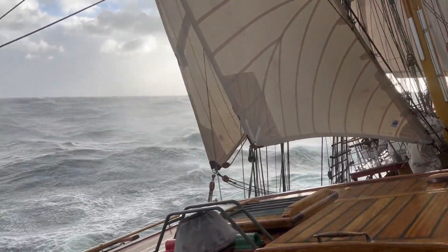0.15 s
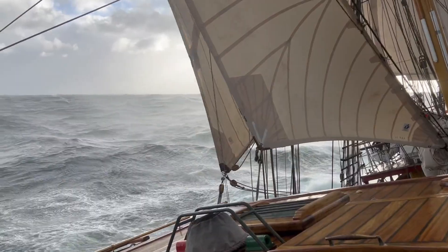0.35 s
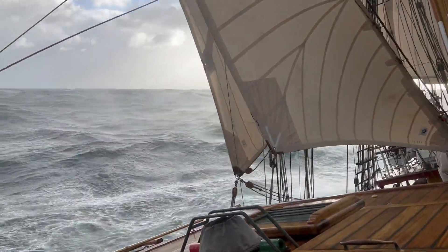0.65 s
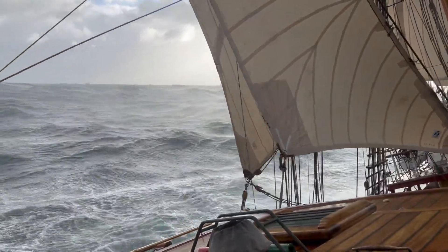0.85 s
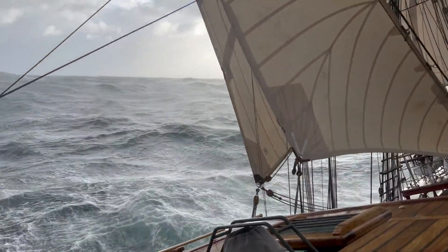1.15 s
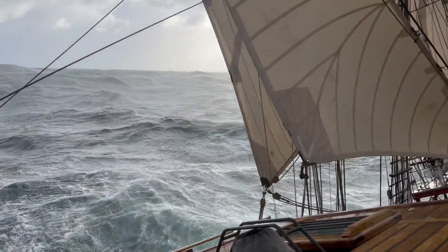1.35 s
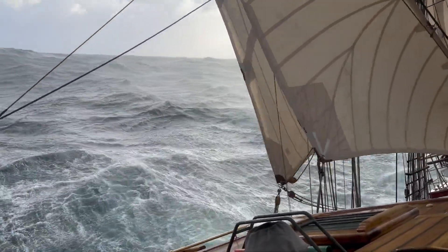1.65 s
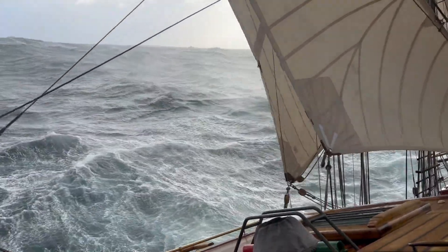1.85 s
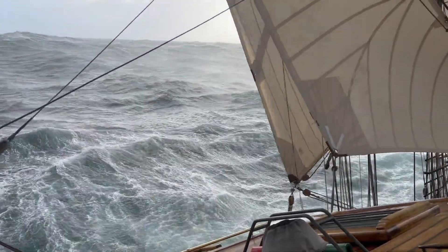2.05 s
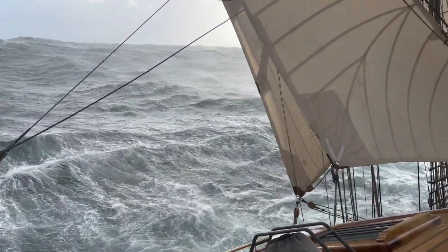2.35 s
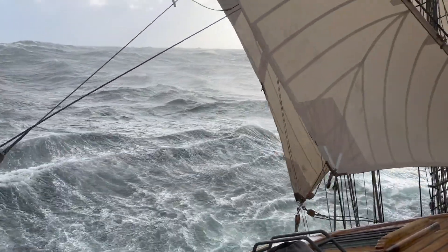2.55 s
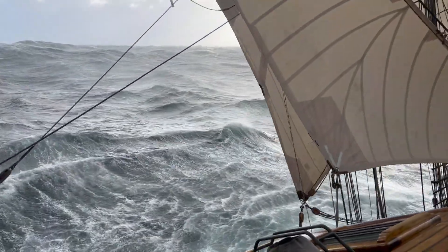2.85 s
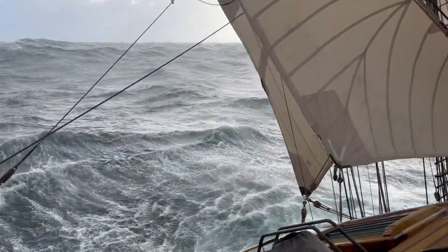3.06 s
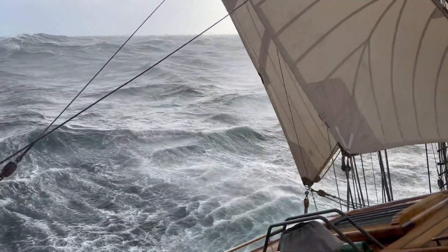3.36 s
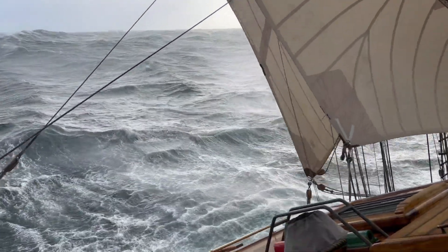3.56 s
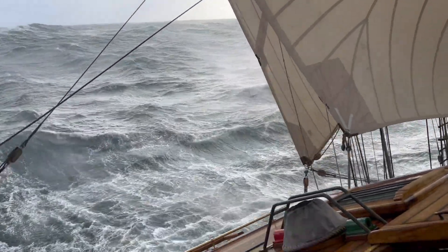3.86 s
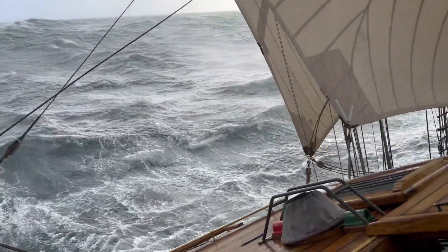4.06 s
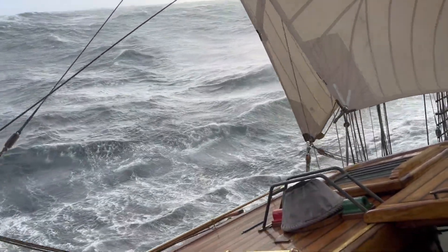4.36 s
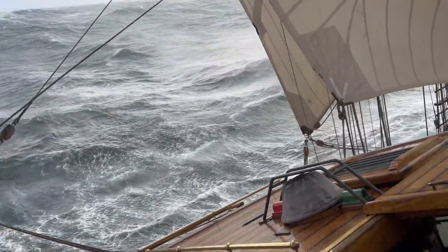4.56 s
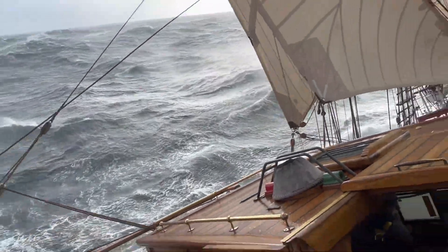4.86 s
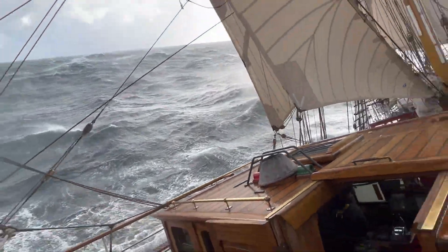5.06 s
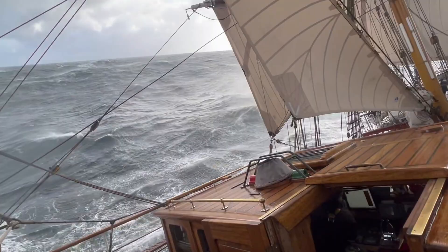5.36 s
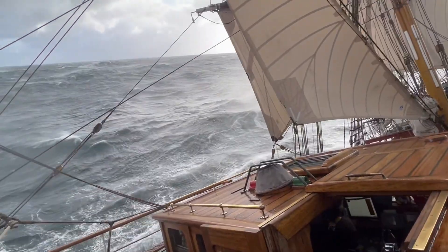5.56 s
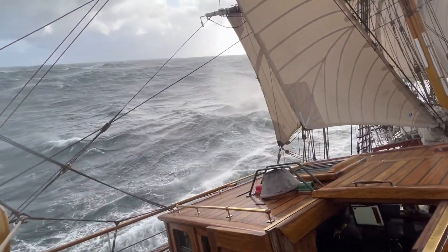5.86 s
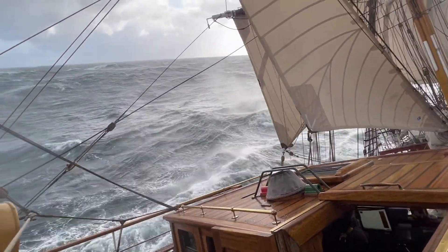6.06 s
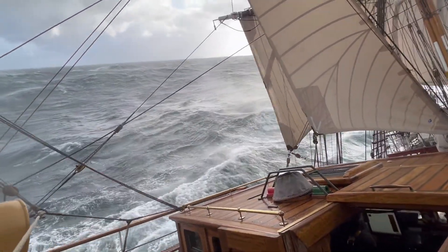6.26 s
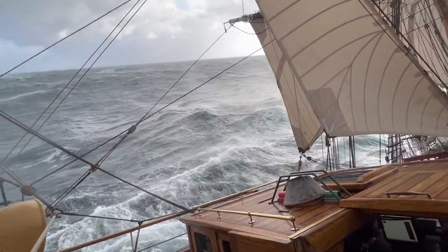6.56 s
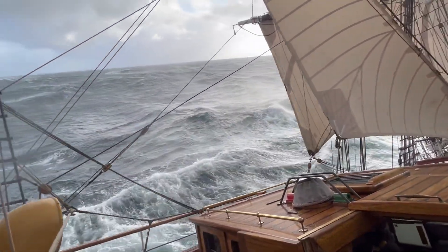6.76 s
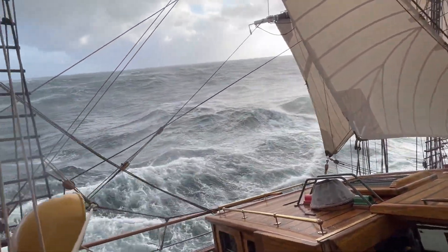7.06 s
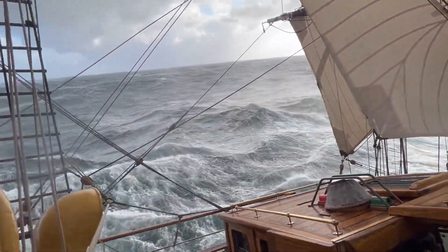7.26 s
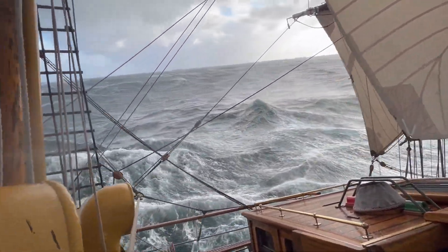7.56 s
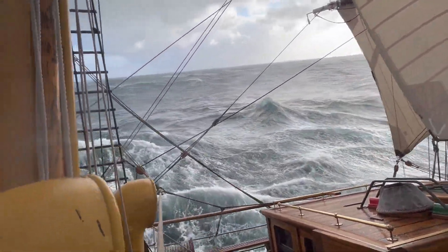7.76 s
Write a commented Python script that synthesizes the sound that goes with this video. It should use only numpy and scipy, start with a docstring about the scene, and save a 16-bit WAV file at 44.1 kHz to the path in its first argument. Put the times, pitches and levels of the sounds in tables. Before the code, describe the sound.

Gale wind buffets the microphone in rapid, uneven gusts, with a low rumble and faint waves behind.

```python
"""A gale buffets the ports of a phone on an open deck at sea. Eddies tear past as short bursts of
pressure jerks over a restless rumble; they snap, spit in the port's cavity and, at their hardest, thump
the phone's body. The bass stays in the middle and the treble spreads wide. Distant waves roar behind.
Late on, blown spray fades in and a thin top band opens, full of hiss and fine ticks."""
import sys
import numpy as np
from scipy import signal
from scipy.fft import rfft, irfft, next_fast_len
from scipy.io import wavfile
from scipy.ndimage import uniform_filter1d, minimum_filter1d

SR = 44100
rng = np.random.default_rng(int(sys.argv[2]) if len(sys.argv) > 2 else 0)


def log_audio(samples):
    """Write samples as a 16-bit WAV file to the path given in sys.argv[1]."""
    # one column per channel
    frames = np.atleast_2d(samples).T
    # limit to full scale, then quantise
    limited = np.clip(frames, -1, 1)
    pcm = np.round(limited * 32767).astype(np.int16)
    wavfile.write(sys.argv[1], SR, pcm)


N = 349095
FFT_SIZE = next_fast_len(N + SR // 2)
BIN_HZ = np.fft.rfftfreq(FFT_SIZE, 1 / SR) + 1  # 1 Hz up, to keep logarithms finite
SPREAD = np.array([[1], [-1]])  # opposite polarity in the two ears
THUD_HZ, SCRATCH_HZ, RASP_HZ = 212, 1265, 2980  # crossovers: thud | tear | scratch | rasp
HISS_DB = -17.5  # the stream's scratch relative to its rush

# passing eddies: crest t/s, tear level/dB, scratch over tear/dB, far port over scratch/dB, length/ms
EDDIES = [(0.058, -27, -24, 9, 16), (0.106, -16.5, -7, 3.5, 19), (0.134, -24.5, -3.5, 1, 24),
          (0.169, -8, -13.5, 1, 7.4), (0.225, -25, -21, 16, 18), (0.264, -32, -11.5, 11.5, 22),
          (0.303, -31.5, -20, 12.5, 19), (0.374, -21, -16, 6.5, 29), (0.451, -25.5, -14.5, 10.5, 15),
          (0.474, -16, -11, -6.5, 19), (0.512, -20.5, -25.5, 16.5, 4.8), (0.552, -23.5, -22, 18.5, 11),
          (0.584, -20.5, -12.5, 2.5, 11), (0.616, -14, -19.5, 11, 5.8), (0.666, -15, -10.5, -1, 19.4),
          (0.724, -17.5, -9.5, 3, 18), (0.746, -21, -8, 9, 5.5), (0.777, -26, -26, 9, 4.2),
          (0.86, -18.5, -10, 4, 18.5), (0.901, -23, -26, 14.5, 57), (0.981, -23.5, -25, 12.5, 6.4),
          (0.995, -15.5, -26, 9.5, 11), (1.042, -28, -10.5, 5, 14), (1.066, -17, -14.5, 7, 21.4),
          (1.116, -19, -12.5, 4.5, 21), (1.208, -21.5, -18.5, 11.5, 9), (1.244, -12, -12.5, 5, 15.8),
          (1.265, -26, -2, -2, 4.5), (1.319, -30, -12.5, 7, 9.7), (1.382, -23, -17, 8, 22),
          (1.452, -32.5, -33.5, 21, 18), (1.495, -35.5, -30, 17, 14), (1.55, -32, -30.5, 12, 12),
          (1.635, -26, -32.5, 16, 13), (1.747, -21, -15, -14.5, 26), (1.851, -21.5, -12.5, -11.5, 13),
          (1.874, -22.5, -12, 0, 6.1), (1.889, -16.5, -24, -1, 2.2), (1.921, -18.5, -12.5, -13.5, 13),
          (2.121, -28, -14, -6, 14), (2.295, -16.5, -5.5, -10, 12.8), (2.33, -34, -15, 8.5, 50),
          (2.358, -27, -6.5, 4, 4), (2.387, -22, -16, 2, 22.5), (2.439, -21, -18, -8, 17),
          (2.472, -30, -8, -5, 18), (2.632, -30, -13, -8, 12), (2.683, -27.5, -13, -4, 8.1),
          (2.708, -21, -16.5, -5, 6.4), (2.735, -24.5, -24, 12, 26), (2.774, -20, -5, -3, 16.3),
          (2.799, -18.5, -18, 8, 8), (2.855, -31, -16.5, 10, 19), (2.953, -26.5, -16, -7, 5.9),
          (3.09, -33.5, -27, 15, 26), (3.289, -15, -36, 9, 2.1), (3.312, -19.5, -19, -0.5, 15.6),
          (3.332, -26, -19, 6, 7.9), (3.368, -37, -24, 14, 12), (3.404, -26, -12.5, -1, 12),
          (3.436, -29.5, -26, 25.5, 4.3), (3.458, -39, -18, 14, 3), (3.506, -17.5, -16.5, 5, 15.4),
          (3.564, -29.5, -7.5, 4.5, 35), (3.6, -23.5, -34, 18, 29), (3.656, -30, -24, 21, 7.1),
          (3.742, -49, -9, 13, 39), (3.882, -30, -12.5, -9.5, 7.7), (3.916, -31.5, -17.5, 11.5, 11),
          (3.956, -18.5, -12, 0.5, 18.5), (3.984, -27.5, -9.5, 1.5, 17), (4.092, -27.5, -17, 6, 35),
          (4.127, -18.5, -6, -13, 16), (4.163, -18.5, -10, -18, 12.5), (4.208, -26.5, -20, 8.5, 28),
          (4.33, -15.5, -17.5, 1, 16), (4.401, -20, -22, -1, 6.9), (4.437, -21, -19, -3, 15),
          (4.459, -25, 2, 1, 6.5), (4.527, -28, -13, -11, 18), (4.573, -21.5, -10.5, 0, 8.8),
          (4.598, -19.5, -6.5, -11, 19), (4.635, -16, -21.5, -3, 1.5), (4.699, -27.5, -2.5, -27, 3.1),
          (4.822, -14, -4.5, 0.5, 9.5), (4.845, -15, -10, -10.5, 20), (4.87, -13.5, 4.5, -15, 2.9),
          (4.917, -27.5, -8, 4, 73), (4.952, -24.5, -9, 5.5, 18), (4.979, -17.5, -8.5, -4.5, 13.5),
          (5.041, -30.5, -3, 1.5, 17), (5.123, -22, -9, -7, 12.4), (5.161, -26, -6, 7, 22),
          (5.205, -21.5, -10.5, -0.5, 30), (5.272, -18.5, -6, -4, 24.7), (5.316, -30, -24, 15.5, 19),
          (5.352, -20, -12.5, 1, 6.8), (5.417, -22, -9.5, 8.5, 35), (5.493, -9.5, -3, -7, 12.5),
          (5.528, -31, -32, 20, 7.1), (5.561, -31, -23, 20, 8.7), (5.616, -25, -10, 2.5, 20),
          (5.665, -27, -13, 7.5, 24), (5.716, -20.5, -6, 6, 12), (5.755, -29, -8, 5, 10),
          (5.795, -26, -29, 19, 21), (5.935, -19.5, -8, 4.5, 25.3), (5.979, -32.5, -14, 7.5, 27),
          (6.141, -27, -5.5, 5, 2), (6.168, -27.5, -13, 6.5, 10), (6.267, -15.5, -6, -4.5, 15),
          (6.293, -13.5, -12.5, -7.5, 17.4), (6.378, -23, -15.5, 9, 7.4), (6.4, -24.5, -11.5, 5, 32),
          (6.434, -22.5, -6.5, 4.5, 17), (6.509, -15.5, -9.5, -5.5, 23), (6.57, -25.5, -18, 3, 16),
          (6.598, -19, -12.5, 6, 27), (6.651, -20, -13, -7, 2.7), (6.718, -20.5, -9.5, 5, 14.2),
          (6.856, -45, -6, 9, 3.6), (6.936, -38.5, -13, -8, 27), (7.008, -31.5, -26, 18, 15),
          (7.07, -35, -21, 15, 6.4), (7.131, -33, -15, -14, 29), (7.323, -33.5, -29, -5, 22),
          (7.361, -29, -26, 7, 32), (7.425, -31, -21, 0, 7.8), (7.496, -34, -13, 13, 5.8),
          (7.588, -18.5, -10, 2, 16.4), (7.622, -24.5, -16.5, -6, 19), (7.688, -18.5, -13.5, -9, 16),
          (7.72, -26.5, -27.5, 14, 7.2), (7.761, -41, -15, 13.5, 7.2), (7.85, -16, -16, -18, 25.6),
          (7.901, -21, -8, -10, 5)]
# the stream of air between eddies: t/s, rush level/dB, rasp level/dB
STREAM = [(0.0, -22.5, -52.5), (0.33, -26.5, -60), (0.42, -38, -67), (0.5, -33.5, -69.5),
          (0.6, -23.5, -59.5), (0.81, -34, -61), (1.36, -36, -71.5), (1.74, -37, -72), (2.05, -37, -65.5),
          (2.4, -38, -68), (2.56, -38.5, -69), (2.8, -31.5, -67), (3.15, -37.5, -68), (3.28, -29.5, -72),
          (3.46, -32.5, -67.5), (3.86, -36.5, -65.5), (4.1, -35, -67), (4.27, -32.5, -63), (4.4, -36, -72),
          (4.7, -39, -68.5), (5.22, -34.5, -60), (5.34, -29.5, -55), (5.49, -33, -56.5), (6.02, -40.5, -85),
          (6.26, -35, -64), (6.48, -37.5, -65), (6.74, -44.5, -73), (7.08, -41.5, -68.5),
          (7.58, -37.5, -69.5), (7.83, -36, -62), (7.92, -24.5, -70)]
# tone of the wind at the near port: f/Hz, relative level/dB
WIND_TONE = [(12, -42.5), (20, -22), (49, -3), (69, 1.5), (124, -1), (239, -6.5), (355, -9), (944, -14.5),
             (1480, -25.5), (2940, -29), (5250, -53.5), (5990, -57), (8670, -83.5), (9640, -73.5),
             (11000, -103), (14300, -133), (22000, -120)]


def undb(db):
    """Decibels to amplitude."""
    return 10 ** (np.asarray(db) / 20)


def along(table):
    """Envelopes from rows of (t/s, values...), one value a sample."""
    times, *columns = np.transpose(table)
    return [np.interp(np.arange(N) / SR, times, column) for column in columns]


def on_bins(points):
    """A curve through (f/Hz, value) points, one value a frequency bin."""
    hz, value = np.transpose(points)
    return np.interp(np.log(BIN_HZ), np.log(hz), value)


def slope(hz, order):
    """Gain in dB of a high-pass (order above 0) or low-pass (below 0) skirt."""
    return -10 * np.log10(1 + (hz / BIN_HZ) ** (2. * order))


def colour(x, db, phase=None):
    """EQ that keeps the power of white noise; minimum phase unless a phase in radians is given."""
    if phase is None:
        cepstrum = irfft(db * np.log(10) / 20, FFT_SIZE)
        cepstrum[1:FFT_SIZE // 2] *= 2
        cepstrum[FFT_SIZE // 2 + 1:] = 0
        phase = rfft(cepstrum).imag
    gain = undb(db)
    response = np.exp(1j * phase) * gain / np.sqrt(np.mean(gain ** 2))
    return irfft(rfft(x, FFT_SIZE) * response, FFT_SIZE)[:N]


def flicker(rate, depth_db):
    """Gain that wanders at random about rate times a second; mean power 1."""
    hold = max(int(SR / rate), 1)
    walk = uniform_filter1d(np.repeat(rng.standard_normal(N // hold + 1), hold), hold)[:N]
    gain = undb(depth_db * walk / walk.std())
    return gain / np.sqrt(np.mean(gain ** 2))


def bursts(crest_s, crest_db, length_ms):
    """Power envelope of bell-shaped swells, with one length for all or one each."""
    power = np.zeros(N)
    half_widths = np.full(len(crest_s), np.clip(length_ms, .5, 60) / 2000 * SR)
    for centre, db, half in zip(crest_s * SR, crest_db, half_widths):
        i = np.arange(max(int(centre - 5 * half), 0), min(int(centre + 5 * half), N))
        power[i] += undb(db) ** 2 * np.exp(-((i - centre) / half) ** 2)
    return power


def jerks(stream_gain, burst_power, grain, even_ms=18):
    """Pressure noise broken into grains by small whirls; burst energy is evened out over even_ms."""
    noise = rng.standard_normal(N)
    torn = grain * noise
    torn /= np.sqrt(uniform_filter1d(torn ** 2, size=int(even_ms / 1000 * SR)) + 1e-6)
    power = stream_gain ** 2 * grain * noise ** 2 + burst_power * torn ** 2
    return np.sqrt(power) * np.sign(noise)


def sea():
    """Distant breaking waves: a smooth roar, spread above the bass."""
    # tone of the waves: f/Hz, relative level/dB
    tone = [(120, -31), (200, 2.5), (430, -8.5), (759, -36), (926, 3), (1610, -16), (2710, -9), (3600, -35),
            (4700, -38.5), (5740, -35.5), (7110, -42), (7800, -43), (10100, -65.5), (17200, -120)]
    roar = on_bins(tone)
    mid = colour(flicker(13, 2.3) * rng.standard_normal(N), roar + slope(1100, order=4), phase=0)
    side = colour(flicker(3, 1.5) * rng.standard_normal(N), roar + slope(1000, order=6), phase=0)
    return undb(-51.5) * (mid + undb(-5) * side * SPREAD)


def spray(from_s=4.9, fade_s=.5, level_db=-65.5):
    """Fine hiss of blown spray, unrelated at the two ears; it rises as the phone turns."""
    # tone of the spray: f/Hz, relative level/dB
    tone = [(20, -120), (1940, -36), (3300, -1), (4170, -2), (4990, -9), (5560, 3), (7180, -10), (7900, -5),
            (8600, -29), (20000, -120)]
    fade_in = np.clip((np.arange(N) / SR - from_s) / fade_s, 0, 1)
    hiss = [colour(flicker(20, 1.5) * rng.standard_normal(N), on_bins(tone), phase=0) for ear in range(2)]
    return undb(level_db) * fade_in * np.array(hiss)


def ticks(faint_count=30, shower_s=(5.14, 6.0)):
    """Power envelope of the loud ticks and a random shower of faint ones."""
    # the loudest ticks: t/s, level/dB
    loud_ticks = [(5.1577, -40.5), (5.231, -45), (5.243, -39), (5.334, -50), (5.414, -47), (5.447, -48.5),
                  (5.4613, -42), (5.47, -40), (5.478, -41), (5.486, -37.5), (5.5412, -35.5), (5.632, -42),
                  (5.6753, -34.5), (5.7, -45.5), (5.729, -38.5), (5.7585, -43.5), (5.781, -44.5),
                  (5.8036, -45), (5.8396, -45.5), (5.877, -42), (5.9024, -32.5), (5.928, -42.5),
                  (6.0112, -43), (6.114, -51), (6.2114, -46.5), (6.3697, -41), (6.4208, -45.5),
                  (6.46, -42.5), (6.598, -43.5), (6.607, -42.5), (6.6828, -32.5), (6.714, -44.5),
                  (7.069, -55), (7.5465, -40.5), (7.555, -36.5)]
    times, db = np.transpose(loud_ticks)
    times = np.append(times, rng.uniform(*shower_s, faint_count))
    db = np.append(db, rng.normal(-53, 5, faint_count))
    return bursts(times, db, length_ms=2.63)


def top_band(tick_power, pan_db=-2):
    """Thin hiss and ticks, a little to the right, reaching the ears out of step."""
    # envelope of the hiss: t/s, level/dB
    hiss_levels = [(4.7, -93), (4.81, -80), (5.1, -69), (5.2, -60), (5.46, -58), (5.58, -74), (5.7, -53),
                   (5.81, -65.5), (5.97, -65), (6.83, -68), (7.92, -63.5)]
    # tone of the band: f/Hz, relative level/dB
    tone = [(7900, -23), (8020, 4), (8300, 3), (8700, -6), (9100, -3), (9900, -11), (10600, -25),
            (11200, -37.5)]
    # left ear against right: f/Hz, phase lead/rad
    left_lead = [(8000, -0.51), (8700, -1.3), (9500, -1.4), (10800, 0.)]
    fade_in = np.clip((np.arange(N) / SR - hiss_levels[0][0]) / .1, 0, 1)
    hiss_gain = fade_in * undb(along(hiss_levels)[0]) * flicker(44, 3.2)
    drive = jerks(hiss_gain, tick_power, grain=flicker(440, 1.3))
    band, lead = on_bins(tone), on_bins(left_lead)
    return np.array([undb(ear * pan_db / 2) * colour(drive, band, ear * lead / 2) for ear in (1, -1)])


def spits(scatter_s=.03):
    """Tiny ticks of air ring the port's cavity; a faint one falls near every eddy."""
    # the distinct spits: t/s, level/dB
    hits = [(0.0478, -56), (0.071, -48.5), (0.1024, -50), (0.2079, -55), (0.2964, -46), (0.4449, -55),
            (0.5476, -47.5), (0.621, -50), (0.6697, -50.5), (0.8061, -60), (0.838, -47.5), (1.063, -56),
            (1.237, -50), (2.297, -47), (2.6658, -62), (2.86, -63), (3.225, -68), (3.4845, -61),
            (3.5814, -54.5), (4.1195, -65), (4.3086, -64), (4.5999, -60), (4.8175, -44), (5.1003, -60),
            (5.1786, -42), (5.216, -42), (5.3113, -45), (5.4085, -41), (5.446, -41), (5.4763, -42),
            (5.5308, -60), (5.6311, -60), (5.7793, -57), (5.9279, -51), (5.9489, -47), (6.1085, -58),
            (6.2367, -58), (6.2657, -46), (6.3659, -61), (6.4178, -60), (6.4794, -52), (6.4971, -48),
            (6.6044, -55), (6.7145, -50)]
    # resonance of the cavity: f/Hz, relative level/dB
    cavity = [(5000, -31.5), (5550, -3), (5900, -4.5), (6250, -8.5), (7000, -23.5)]
    times, db = np.transpose(hits)
    crest_s = np.transpose(EDDIES)[0]
    shift, size = rng.standard_normal((len(crest_s), 2)).T
    _, stream_rasp_db = along(STREAM)
    faint_db = stream_rasp_db[(crest_s * SR).astype(int)] - 4 + 5 * size
    times = np.append(times, crest_s + scatter_s * shift)
    db = np.append(db, faint_db)
    drive = jerks(0, bursts(times, db, length_ms=4.5), grain=1)
    return colour(drive, on_bins([(20, -120)] + cavity + [(11000, -120)]), phase=0)


def thumps(rise_s=.0029):
    """The hardest slaps of air ring the low modes of the phone's body."""
    # slaps: t/s, level/dB
    slaps = [(0.164, -14), (0.723, -18), (0.993, -20), (4.8166, 2.5), (5.491, -7), (6.261, -15)]
    # body modes: f/Hz, level/dB, t60/s
    modes = [(220.4, -0.5, 0.073), (416, -3.5, 0.062)]
    t = np.arange(SR // 8) / SR
    ring = sum(undb(db) * np.sin(2 * np.pi * hz * t) * np.exp(-np.log(1000) * t / t60)
               for hz, db, t60 in modes)
    ring *= (1 - np.exp(-t / rise_s)) ** 2  # the push of air builds up
    track = np.zeros(N + SR)
    for at_s, db in slaps:
        start = int(at_s * SR)
        track[start:start + len(t)] += undb(db) * ring
    return track[:N]


def snaps(snap_ms=1.35, tilt_db_per_octave=2):
    """Short, bright, dry pops: one opens every eddy, and louder ones crack at the heart of some."""
    # the loudest snaps: t/s, level/dB
    loud_snaps = [(0.099, -12.5), (0.12, -16.5), (0.135, -12), (0.144, -17), (0.169, -16.5), (0.45, -21),
                  (0.473, -13), (0.583, -15), (0.668, -13), (0.708, -13), (0.716, -17.5), (0.725, -7.5),
                  (0.745, -24.5), (0.85, -16.5), (1.064, -19), (1.118, -21.5), (1.2325, -14), (1.237, -23),
                  (1.247, -17.5), (1.889, -14.5), (2.2897, -9.5), (2.2989, -11), (2.436, -13.5),
                  (2.44, -14.5), (2.7636, -14), (3.558, -11.5), (3.95, -36), (4.124, -12), (4.3994, -25),
                  (4.6015, -9.5), (4.6992, -17), (4.82, -8.5), (4.845, -7.5), (4.873, -21), (4.949, -14),
                  (4.953, -15), (4.984, -13), (5.1239, -12.5), (5.161, -9), (5.41, -14.5), (5.413, -16),
                  (5.425, -16), (5.4295, -16), (5.439, -16), (5.4469, -17.5), (5.4974, -7.5),
                  (5.7146, -10.5), (5.932, -12.5), (6.144, -20), (6.168, -21), (6.268, -12), (6.293, -8.5),
                  (6.3787, -20.5), (6.4008, -15.5), (6.5025, -12), (6.649, -16.5), (6.714, -11),
                  (7.846, -15)]
    crest_s, tear_db, *_, eddy_ms = np.transpose(EDDIES)
    times, db = np.transpose(loud_snaps)
    times = np.append(times, crest_s - .35 * eddy_ms / 1000)
    db = np.append(db, tear_db - 18)
    drive = jerks(0, bursts(times, db, snap_ms), grain=flicker(1500, 5.5), even_ms=snap_ms)
    tone = on_bins(WIND_TONE) + tilt_db_per_octave * np.log2(BIN_HZ)
    return colour(drive, tone + slope(564, order=3) + slope(3500, order=-3))


def rumble(thud_lag_s=.0047, even_s=.06):
    """Low heaving of the air, with a thud just after the crest of each eddy."""
    # envelope of the rumble: t/s, level/dB
    levels = [(0.0, -17.5), (0.04, -15.5), (0.4, -19.5), (0.44, -28.5), (0.75, -19), (0.77, -34),
              (0.86, -20), (0.95, -29.5), (1.12, -23), (1.19, -35.5), (1.25, -22), (1.3, -29.5),
              (1.68, -36.5), (1.96, -25.5), (2.05, -40), (2.12, -34.5), (2.25, -41.5), (2.29, -26.5),
              (2.47, -26), (2.56, -38), (2.78, -23.5), (3.06, -37), (3.57, -27), (3.92, -35.5),
              (3.97, -15.5), (4.03, -34), (4.14, -20.5), (4.27, -32), (4.34, -22), (4.56, -37.5),
              (4.61, -16.5), (4.67, -38.5), (4.72, -23.5), (4.76, -41), (4.82, -26), (4.855, -18),
              (4.89, -27.5), (4.98, -19.5), (5.05, -36.5), (5.22, -20), (5.5, -20), (5.55, -24),
              (5.74, -29), (5.79, -23), (5.89, -32.5), (5.95, -20.5), (6.06, -36), (6.17, -26),
              (6.22, -39.5), (6.28, -20), (6.35, -37), (6.39, -22.5), (6.47, -19), (6.68, -31.5),
              (6.74, -27), (6.79, -35), (6.97, -33), (7.14, -39), (7.34, -26.5), (7.47, -40), (7.69, -22.5),
              (7.76, -29.5), (7.81, -34), (7.85, -11.5), (7.92, -34)]
    crest_s, tear_db, *_, eddy_ms = np.transpose(EDDIES)
    thud_db = -26 + .82 * (tear_db + 20)  # a harder tear brings a heavier thud
    power = (undb(along(levels)[0]) * flicker(12, 2.2)) ** 2
    power += bursts(crest_s + thud_lag_s, thud_db, .9 * eddy_ms)
    heave = colour(rng.standard_normal(N), on_bins(WIND_TONE) + slope(THUD_HZ, order=-3))
    heave /= (uniform_filter1d(heave ** 2, size=int(even_s * SR)) + 1e-6) ** .25  # 2:1 compression
    low_pass = signal.butter(2, 1.6 * THUD_HZ, fs=SR, output="sos")
    return signal.sosfilt(low_pass, heave / heave.std() * np.sqrt(power))


def near_rasp(eddy_rasp_db, tick_power, linger_ms=2.6, high_rasp_hz=4330):
    """The smallest eddies rasp; the highest rasp is a thin, patchy hiss that flickers on its own."""
    # surges of dense rasp, longer and smoother than an eddy: crest t/s, level/dB, length/ms
    surges = [(0.04, -51, 47), (0.12, -47, 64), (0.175, -45, 17), (0.21, -58, 29), (0.27, -55, 26),
              (0.3, -48, 25), (0.33, -48, 34), (0.38, -48, 15), (0.46, -47, 17), (0.556, -52, 19),
              (0.62, -53, 46), (0.75, -64, 20), (0.81, -69, 22), (0.855, -56, 20), (0.899, -54, 24),
              (1.07, -50.5, 25), (3.51, -53, 30), (3.655, -52, 15), (4.15, -59, 27), (4.334, -49, 22),
              (4.9, -51, 48), (4.96, -44, 18), (5.19, -44.5, 28), (5.24, -45, 45), (5.35, -52, 24),
              (5.42, -41, 31), (5.94, -47, 26), (6.29, -42, 27), (6.4, -67, 50), (6.5, -39, 14)]
    crest_s, *_, eddy_ms = np.transpose(EDDIES)
    _, stream_rasp_db = along(STREAM)
    power = bursts(crest_s, eddy_rasp_db, .94 * eddy_ms + linger_ms) + tick_power * undb(-13.5) ** 2
    rasp = jerks(undb(stream_rasp_db) * flicker(21, 3.3), power, grain=flicker(300, 5.5))
    surge = jerks(0, bursts(*np.transpose(surges)), grain=flicker(130, 3) * flicker(300, 2.4))
    high_rasp = (rasp + undb(4.5) * surge) * flicker(40, 3.6) * undb(-2.5)
    low_rasp = rasp * flicker(27, 2.3)
    tone = on_bins(WIND_TONE)
    return (colour(low_rasp, tone + slope(RASP_HZ, order=6) + slope(high_rasp_hz, order=-6))
            + colour(high_rasp, tone + slope(high_rasp_hz, order=8))
            + colour(surge, .4 * tone + slope(RASP_HZ, order=8) + slope(5340, order=-10)))


def far_port(eddy_scratch_db, eddy_rasp_db, tick_power, apart_db=10.5):
    """The same air scratches and rasps at the far port with whirls of its own; ticks knock on it."""
    # tone of the stereo spread: f/Hz, relative level/dB
    spread_tone = [(290, -80), (500, -60.5), (607, -51), (737, -29), (942, -9), (1220, 4.5), (1970, -4),
                   (2520, 1.5), (3060, -1), (3910, -12), (5330, -11.5), (5910, -21), (11000, -73.5),
                   (14300, -108), (22000, -120)]
    crest_s, _, _, far_db, eddy_ms = np.transpose(EDDIES)
    rush_db, stream_rasp_db = along(STREAM)
    knocks = tick_power * undb(11) ** 2
    whirls = flicker(51, 2.8) * flicker(220, 10.7)
    scratch_power = bursts(crest_s, eddy_scratch_db + far_db, 1.58 * eddy_ms) + knocks
    scratch = jerks(undb(rush_db + HISS_DB + apart_db) * flicker(18, 3), scratch_power, whirls)
    rasp_power = bursts(crest_s, eddy_rasp_db + far_db / 2, .85 * eddy_ms) + knocks * undb(-22) ** 2
    rasp = jerks(undb(stream_rasp_db + apart_db / 2) * flicker(25, 3), rasp_power, whirls)
    tone = on_bins(spread_tone)
    return (colour(scratch, tone + slope(RASP_HZ, order=-4))
            + undb(8) * colour(rasp, tone + slope(RASP_HZ, order=6)))


def wind(tick_power):
    """Large eddies thud, middle ones tear, small ones scratch and rasp; the far port adds only width."""
    crest_s, tear_db, scratchiness_db, _, eddy_ms = np.transpose(EDDIES)
    rush_db, stream_rasp_db = along(STREAM)
    scratch_db = tear_db + scratchiness_db
    # an eddy's rasp follows its scratch and the stream around it; no two rasp alike
    rasp_db = scratch_db - 24.5 - .13 * (scratchiness_db + 12)
    rasp_db += .62 * (stream_rasp_db[(crest_s * SR).astype(int)] + 65)
    rasp_db += rng.standard_normal(len(crest_s))
    gusts = flicker(22, 2.33)
    whirls = flicker(90, 2.5) * flicker(250, 4.2)
    bass = rumble()
    tear = jerks(undb(rush_db) * gusts, bursts(crest_s, tear_db, 1.06 * eddy_ms), whirls)
    scratch_power = bursts(crest_s, scratch_db, 1.15 * eddy_ms)
    scratch = jerks(undb(rush_db + HISS_DB) * np.sqrt(gusts), scratch_power, whirls * flicker(400, 5))
    tone = on_bins(WIND_TONE)
    tear = colour(tear, tone + slope(THUD_HZ, order=3) + slope(SCRATCH_HZ, order=-4))
    scratch = colour(scratch, tone + slope(SCRATCH_HZ, order=4) + slope(RASP_HZ, order=-4))
    rasp = near_rasp(rasp_db, tick_power)
    side = far_port(scratch_db, rasp_db, tick_power)
    treble = scratch + rasp + snaps()
    # the near port's treble joins the spread a quarter cycle early
    side += .5 * colour(treble, slope(SCRATCH_HZ, order=4), phase=np.pi / 2)
    return bass + tear + treble + side * SPREAD


def scene():
    """The gale over sea and spray; the same ticks sound at the ports and in the top band."""
    tick_power = ticks()
    return wind(tick_power) + thumps() + spits() + sea() + spray() + top_band(tick_power)


def record(dry):
    """The phone cuts the top, and a look-ahead limiter ducks both ears under the loudest peaks."""
    top_hz, ceiling, window_samples = 11200, .9, 257
    high_cut = signal.ellip(10, .2, 50, top_hz, fs=SR, output="sos")
    cut = signal.sosfilt(high_cut, dry)
    duck = ceiling / np.maximum(np.abs(cut).max(axis=0), ceiling)
    gain = uniform_filter1d(minimum_filter1d(duck, size=window_samples), size=window_samples)
    return signal.sosfilt(high_cut, cut * gain)


dry = scene()
out = record(dry)
log_audio(out)
```